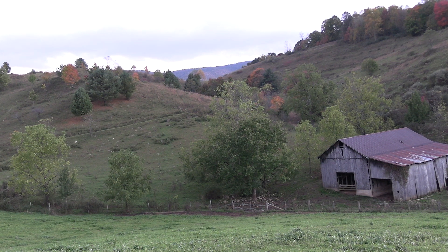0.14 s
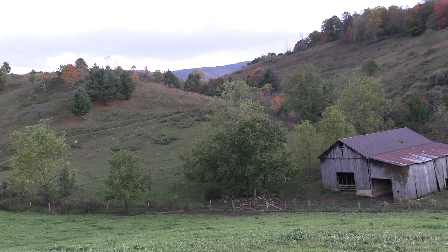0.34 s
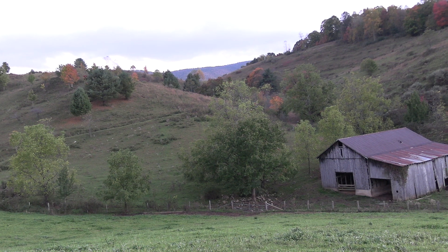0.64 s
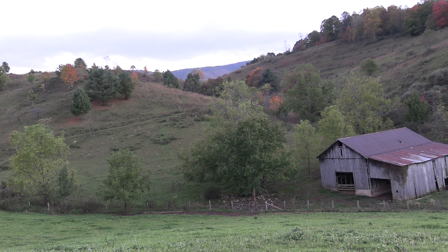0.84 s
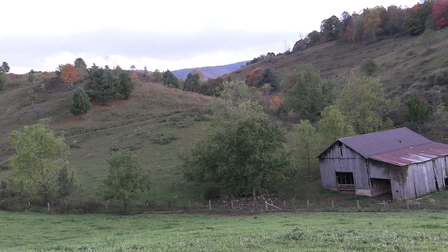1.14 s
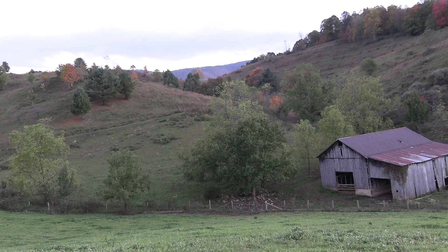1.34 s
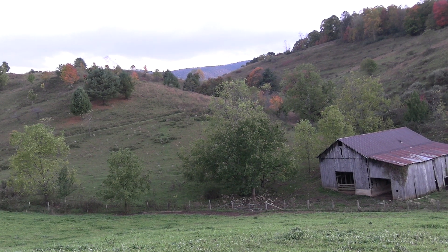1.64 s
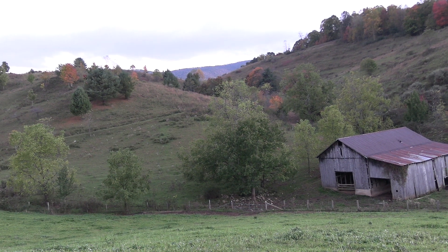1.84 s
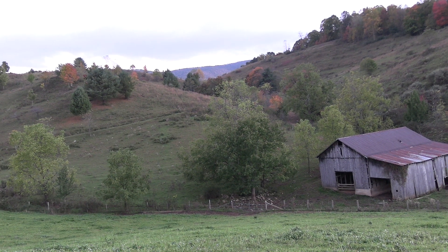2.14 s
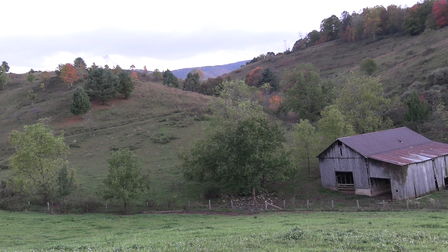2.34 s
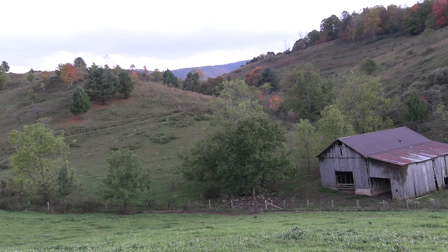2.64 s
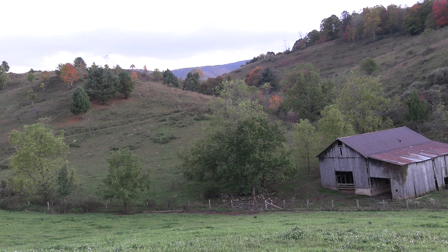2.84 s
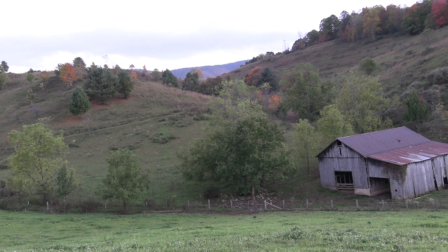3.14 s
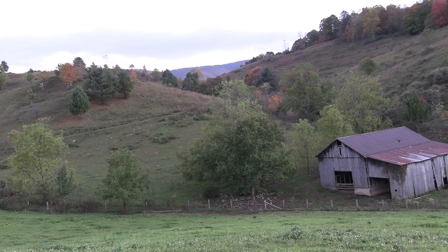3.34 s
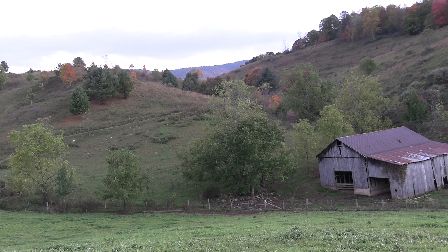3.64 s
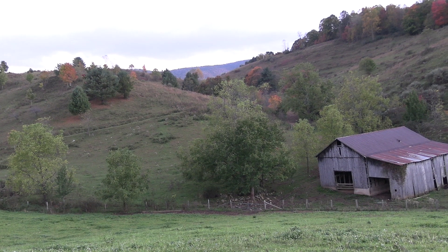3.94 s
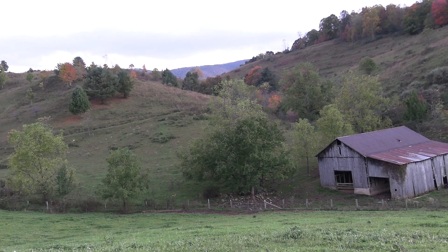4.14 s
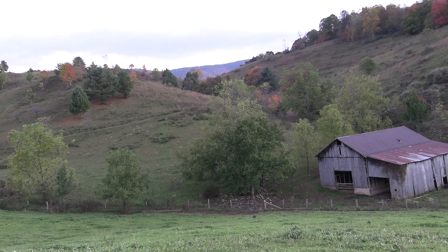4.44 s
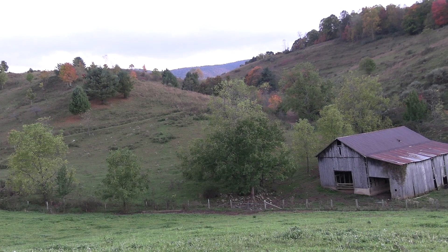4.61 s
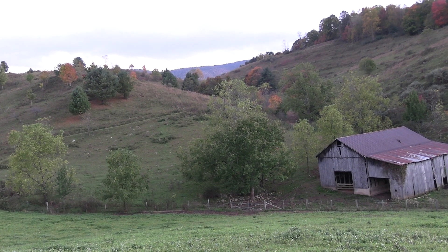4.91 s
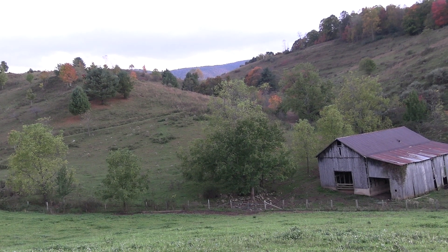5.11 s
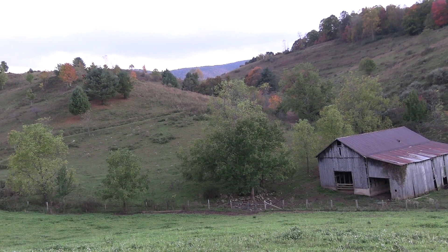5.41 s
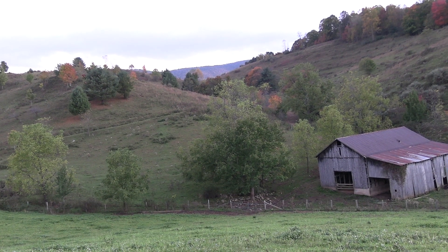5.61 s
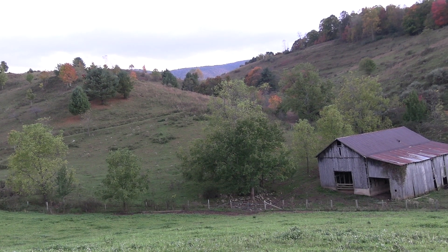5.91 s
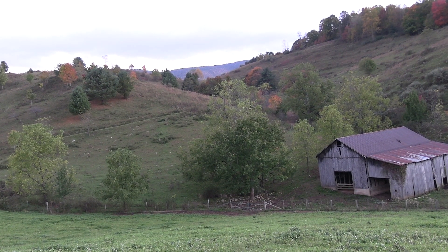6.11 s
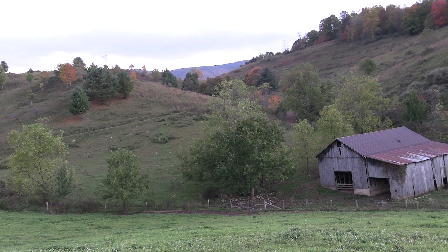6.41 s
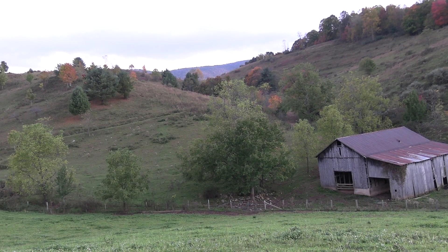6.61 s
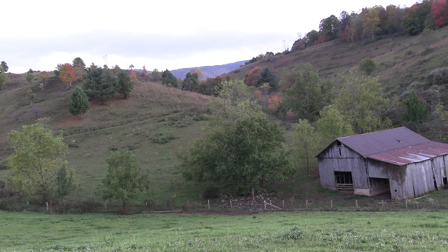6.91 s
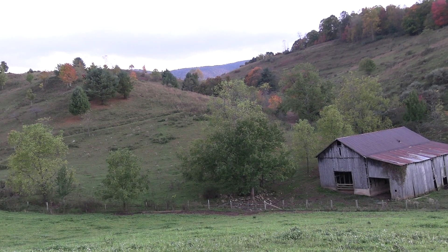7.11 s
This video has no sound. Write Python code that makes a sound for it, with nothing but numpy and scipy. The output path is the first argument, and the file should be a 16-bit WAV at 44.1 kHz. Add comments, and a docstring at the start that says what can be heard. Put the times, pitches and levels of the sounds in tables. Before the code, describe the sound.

A quiet hillside pasture outdoors, with soft still air and a distant insect chorus throbbing in narrow bands. At about 0.2 s a coyote gives a small double-edged bark, quiet and short, while the echo of an earlier howl dies away. From 0.5 s to 4 s nearby crickets trill in separate high, buzzing bursts of a fraction of a second, some clear, some faint; a small bird gives tiny swept chips, and a soft low bump falls near 0.9 s. At 4.1 s a rough bark leads into a wavering yelp, which flips at 4.6 s into a loud high howl, cracking and rasping around 4.9-5.1 s, then settling lower and dropping off at 5.5 s. Hills send back a late, dull wash. At 6.1 s one loud, abrupt hooting bark echoes. Crickets and chips continue to the end at about 7.4 s, with a very faint far howl near 6.5 s.

```python
"""Hill pasture: a coyote barks, breaks from a yelp into a high warbling howl, and barks again; the hills echo it.
Voice: harmonic sines with rasp, undertones and hiss. Barks: chaotic pulses and air through mouth resonances.
Three crickets trill nearby as gated falling tones, and a small bird chips in swept whistles.
Behind them: a far insect chorus in throbbing noise bands, an old echo, still air, low bumps, far tones."""
import sys
import numpy as np
from scipy import signal
from scipy.fft import rfft, irfft
from scipy.io import wavfile
from scipy.ndimage import uniform_filter1d, minimum_filter1d

SR = 44100
rng = np.random.default_rng(int(sys.argv[2]) if len(sys.argv) > 2 else 0)


def store_wav(level_fs):
    """Save 16-bit WAV to argv[1]."""
    pcm = np.round(np.clip(np.atleast_2d(level_fs), -1, 1) * 32767)
    wavfile.write(sys.argv[1], SR, pcm.T.astype(np.int16))


N = 320386
TIME_S = np.arange(N) / SR
FREQS_HZ = np.fft.rfftfreq(N, 1 / SR)

# howl registers, low, high, low again: (time [s], pitch [Hz], level [dB], third-harmonic ring [dB])
YELP = [(4.17, 540, -28, -28), (4.222, 512, -24, -23), (4.252, 465, -43, -5), (4.278, 730, -42, -30),
        (4.327, 890, -25, -32), (4.338, 682, -29, -8), (4.362, 662, -22, -6), (4.395, 645, -23, -7),
        (4.42, 565, -25, -18), (4.455, 525, -21, -13), (4.485, 535, -19.5, -15), (4.51, 645, -22, -8),
        (4.553, 743, -20, -14), (4.603, 789, -19, -21), (4.614, 900, -13, -24)]
SCREAM = [(4.607, 1405, -11.5, -23), (4.66, 1480, -10.5, -16), (4.735, 1555, -11.5, 1),
          (4.81, 1432, -11, -14), (4.85, 1488, -11, -19), (4.9, 1488, -10.5, -16),
          (4.922, 1415, -14.5, -22), (4.945, 1345, -13.5, -16), (4.975, 1465, -15, -28),
          (4.997, 1375, -14.5, -20), (5.102, 1367, -16, -24), (5.118, 1150, -19.5, -24),
          (5.185, 1098, -15.5, -5), (5.42, 1047, -15.5, -5), (5.45, 1038, -17.5, -23),
          (5.51, 1018, -24, -24)]
DROP = [(5.508, 1018, -31, -26), (5.525, 862, -30, -22), (5.542, 612, -28, -16), (5.556, 533, -44, -12)]
# strain of the voice: (time [s], rasp [0-1])
STRAIN = [(4.228, .012), (4.248, .15), (4.265, .005), (4.47, 0), (4.498, .018), (4.507, .19), (4.585, .09),
          (4.61, .2), (4.622, .025), (4.72, .11), (4.8, .075), (4.915, .08), (4.935, .4), (4.962, .42),
          (4.98, .05), (5.0, .22), (5.11, .2), (5.17, .01), (5.42, 0), (5.505, .05), (5.524, .2),
          (5.545, .05)]
# voice catches, pitch dips: (time [s], half-width [s], depth [share of pitch])
CATCHES = [(4.931, 0.0037, 0.15), (4.947, 0.0025, 0.059), (4.961, 0.0046, .12), (5.003, 0.01, .11),
           (5.03, 0.0068, 0.086), (5.053, .004, 0.17), (5.079, .008, 0.12)]
# overtone colour of the throat: (frequency [Hz], gain [dB])
THROAT = [(400, -13), (750, 6), (1300, 9), (2200, -1), (2600, -10.5), (3100, -6), (3750, 0), (4100, -15),
          (4600, -23.5), (5400, -14.5), (6200, -47.5), (9000, -60.5)]
# hiss of the strained folds: (frequency [Hz], relative level [dB])
RASP = [(380, -28.5), (600, -8), (1250, 2), (1800, -11.5), (2700, -20), (3450, -3), (4150, -14),
        (4500, -38), (6000, -43)]
# tremor as the scream settles; depth as share of pitch
QUAVER_START_S, QUAVER_END_S, QUAVER_HZ, QUAVER_DEPTH = 5.11, 5.18, 92, .03
BRIGHTEN_DB_PER_DB = 1.2  # extra treble, against the fundamental, as the voice gets louder

# mouth resonances of a soft, a full and a hooting bark: (frequency [Hz], relative level [dB])
SOFT_MOUTH = [(330, -45), (480, 5.5), (560, -4), (750, -0.5), (980, -12), (1200, -3), (1500, -10),
              (1750, -19.5), (2600, -31), (3000, -56)]
FULL_MOUTH = [(330, -44.5), (440, -7), (560, 7), (720, -4.5), (900, 0), (1200, 0.5), (1500, -4),
              (1800, -9.5), (2100, -11.5), (2600, -24.5), (3000, -58.5)]
HOOT_MOUTH = [(330, -33), (440, -14), (520, -3), (590, 4), (700, -8), (860, -6), (1170, -3.5), (1480, -4.5),
              (1750, -9.5), (2000, -16), (2600, -28), (3000, -50)]
MOUTHS = {"soft": SOFT_MOUTH, "full": FULL_MOUTH, "hoot": HOOT_MOUTH}
# bright edge of a bark: (frequency [Hz], relative level [dB])
BARK_EDGE = [(2600, -24), (3050, -0.5), (3400, 3.5), (3900, -6), (4250, -17.5), (4500, -21), (5400, -27.5),
             (7000, -48)]
# barks: (start [s], peak [s], peak level [dB], fall [dB/s], opening crack [dB], bright edge [dB],
#         pitch [Hz], chaos left from the peak on [0-1], mouth)
BARKS = [(.216, .236, -49, 400, 0, -7, 680, .9, "soft"),
         (.243, .282, -28, 680, 11.5, -22, 700, .35, "soft"),
         (4.108, 4.164, -17, 310, -2, -19, 535, .2, "full"),
         (6.048, 6.118, -11.5, 950, -1.5, -15, 580, .15, "hoot")]
SWELL_DB_PER_S, ONSET_DB_PER_S = 190, 2000  # abrupt start, then swell to the peak
CRACK_HALF_WIDTH_S, EDGE_GROWTH_DB_PER_DB = .004, 2.2  # edge growth per dB of body
# muzzle radiation, no bass and little top: (frequency [Hz], gain [dB])
MUZZLE = [(200, -45), (330, -33.5), (450, -2), (4150, 0.5), (4450, 0), (4700, -13), (5000, -9.5),
          (5450, -1.5), (5800, -10), (8000, -27.5)]

# colour of the hill echo: (frequency [Hz], gain [dB])
HILL_COLOUR = [(300, -6.5), (560, -10.5), (800, -3.5), (1080, -1), (1500, -1), (2200, -3.5), (3200, -3),
               (5000, -18.5)]
# echo crest delay, build-up before it, loss over the next second, early scatter re crest
HILL_DELAY_S, HILL_RISE_DB_PER_S, HILL_LOSS_DB, HILL_EARLY_DB = .4, 85, 10.2, -22
HILL_LAST_S = 2.15  # farthest slope
OLD_ECHO_DB, OLD_ECHO_FALL_DB_PER_S = -58.3, 22  # an earlier howl dying away

# wing strokes: name: (rate [1/s], pitch [Hz], first scrape [dB], its width [s],
#                      second scrape at [s], its width [s], octave [dB])
CRICKETS = {"loud": (46.05, 7540, -1.5, .0012, .0062, .0019, -28),
            "swept": (45.4, 7350, 2, .0007, .0072, .0018, -9.5),
            "faint": (44.6, 6900, -2, .0013, .004, .0035, -27)}
# trills: (start [s], length [s], level [dB], cricket)
TRILLS = [(.474, .146, -45, "loud"), (.754, .26, -53.5, "swept"), (.996, .193, -45, "loud"),
          (1.193, .122, -57, "faint"), (1.586, .169, -45, "loud"), (1.69, .14, -62, "faint"),
          (2.135, .115, -57, "faint"), (2.185, .186, -45, "loud"), (2.59, .258, -49.5, "swept"),
          (2.788, .172, -45, "loud"), (3.04, .15, -58, "faint"), (3.304, .28, -45, "loud"),
          (3.52, .14, -60, "faint"), (3.585, .083, -52, "loud"), (3.945, .145, -58, "faint"),
          (4.375, .125, -56, "faint"), (4.484, .215, -53.5, "swept"), (4.694, .149, -47.5, "loud"),
          (5.119, .305, -55.5, "swept"), (5.448, .167, -47, "loud"), (5.864, .305, -52.5, "swept"),
          (6.163, .17, -47, "loud"), (6.475, .12, -56, "faint"), (6.781, .193, -45.5, "loud"),
          (6.931, .305, -50.5, "swept")]
STROKE_SAG_HZ_PER_S, FIRST_SCRAPE_S = 33000, .0014  # the wing slows through each stroke
WING_RING_DB, WING_RING_S = -12, .012  # the wing rings on between scrapes

# bird chips: (time of lowest pitch [s], level [dB], fade-in [s], fade-out [s])
CHIPS = [(.328, -57, .001, .008), (.683, -56, .001, .008), (.732, -52, .004, .004),
         (2.258, -51, .004, .004), (2.588, -51, .001, .008), (4.447, -46.5, .004, .004),
         (4.688, -45, .001, .009), (5.70, -48.5, .004, .004), (6.609, -51, .001, .008),
         (6.73, -49, .004, .004)]
CHIP_LOW_HZ, CHIP_SWEEP_HZ, CHIP_GLIDE_S = 5080, 2900, .0052

# main far chorus: (time [s], level [dB])
FIELD_CRICKETS = [(0, -57.5), (.4, -60), (1.45, -60), (2.03, -53.5), (2.67, -61), (3.33, -58),
                  (4.05, -59.5)]
# other far choruses: (centre [Hz], width [Hz], level [dB], mean pulse rate [1/s], pulse depth [0-1])
CHORUSES = [(1675, 170, -70, 19, .6), (3800, 490, -71, 4.7, 0.3), (5260, 460, -72.5, 15.3, .35),
            (5580, 350, -80, 39, .3)]
# still outdoor air: (frequency [Hz], relative level [dB])
AIR = [(20, 1), (50, -6), (110, -6), (200, -14.5), (350, -18), (650, -23), (1400, -24), (2500, -31.5),
       (4000, -25.5), (4600, -34), (6000, -32), (8500, -35.5), (11000, -37), (15500, -40.5)]
# soft low bumps: (time [s], level [dB])
THUMPS = [(0.887, -39), (1.315, -50), (4.262, -43.5)]
# two far howls and a low drone: (start [s], end [s], pitch [Hz], level [dB], waver [Hz])
FAR_TONES = [(3.15, 3.95, 915, -71, 12), (6.4, 7.0, 585, -65, 8), (6.38, 7.12, 143, -55, 3)]
CUTOFF_HZ = 15750


def howl():
    """The yelp flips up an octave into the scream, which catches, quavers as it settles, then drops away."""
    dips = sum(depth * bump(TIME_S, s, width_s) for s, width_s, depth in CATCHES)
    quaver = QUAVER_DEPTH * gate(QUAVER_START_S, QUAVER_END_S, .02) * np.sin(2 * np.pi * QUAVER_HZ * TIME_S)
    yelp = voice(YELP, 0, clean_db=-23, second_db=15.5, high_db=-27, high_rasp_db=10, under_db=4,
                 top_hz=5500, jitter=.12, hiss_db=-4)
    scream = voice(SCREAM, dips + quaver, clean_db=-32, second_db=0.8, high_db=-26.5, high_rasp_db=-30,
                   under_db=-3.5, top_hz=6000, jitter=.04, hiss_db=-16, shimmer=.75)
    drop = voice(DROP, 0, clean_db=-23, second_db=14, high_db=-30, high_rasp_db=-8, under_db=-6,
                 top_hz=5500, jitter=.06, hiss_db=-12)
    return yelp + drop + scream * (1 + 9 * quaver)


def voice(rows, dips, clean_db, second_db, high_db, high_rasp_db, under_db, top_hz, jitter, hiss_db,
          shimmer=1.0, snap_db=6, flare_db=10, surge_db=3.5):
    """One register: clean folds favour odd harmonics; strain adds octave, treble, half-pitch undertones, rasp."""
    pitch_hz, level_db, third_db = in_time(rows)
    rasp = np.clip(in_time(STRAIN)[0], 0, 1)
    pitch_hz = pitch_hz * (1 - dips) * (1 + jitter * (rasp + 0.066) * band_noise(0, 440))
    flutter = 1 + np.tanh(shimmer * rasp * band_noise(0, 250))
    # at each catch the folds slap harder: the voice surges, the overtones flare
    slap = np.tanh(dips / .08) * np.ones(N)
    surge = from_db(surge_db * slap)
    hiss = from_db(hiss_db) * (rasp + 5 * dips) * colour(rng.standard_normal(N), RASP)

    sounding = gate(rows[0][0], rows[-1][0], .007)
    on = sounding > 0
    pitch_hz, rasp, slap = pitch_hz[on], rasp[on], slap[on]
    phase = phase_of(pitch_hz)
    second_gain = from_db(clean_db) + from_db(second_db) * rasp
    second = second_gain * gain_at(THROAT, 2 * pitch_hz) * np.sin(2 * phase)
    third_gain = from_db(third_db[on] + flare_db * slap)
    third = third_gain * gain_at(THROAT, 3 * pitch_hz) * np.sin(3 * phase)

    k = np.arange(4, 11)[:, None]
    # rough folds lose their highest overtones
    weights = gain_at(THROAT, k * pitch_hz) / (1 + (k * pitch_hz * (1 + rasp) / top_hz) ** 20)
    brightness = from_db(BRIGHTEN_DB_PER_DB * (level_db[on] + 18))
    high_gain = brightness * (from_db(high_db) + from_db(high_rasp_db) * rasp)
    high = high_gain * (weights * np.sin(k * phase)).sum(0)

    # the throat delays each undertone differently, so they do not pile up into spikes
    halves = np.arange(.5, 3)[:, None]
    offsets = rng.uniform(0, 2 * np.pi, halves.shape)
    undertones = gain_at(THROAT, halves * pitch_hz) * np.sin(halves * phase + offsets)
    under = rasp * from_db(under_db + snap_db * rasp * (slap - 1)) * undertones.sum(0)

    tones = np.sin(phase) + second + third + high + under
    out = np.zeros(N)
    # hiss puffs once a cycle
    out[on] = np.sqrt(2) * tones * flutter[on] + hiss[on] * (1 + np.cos(phase))
    return out * from_db(level_db) * surge * sounding


def bark(start_s, peak_s, peak_db, fall_db_per_s, crack_db, edge_db, pitch_hz, settled, mouth):
    """Chaotic fold pulses and puffs of air ring in the mouth; the pitch steadies as the bark swells."""
    swell_db = SWELL_DB_PER_S * (TIME_S - peak_s)
    fall_db = fall_db_per_s * (peak_s - TIME_S)
    effort_db = np.minimum(swell_db, fall_db) - ONSET_DB_PER_S * np.maximum(start_s - TIME_S, 0)
    effort_db = np.maximum(effort_db + crack_db * bump(TIME_S, start_s, CRACK_HALF_WIDTH_S), -150)
    chaos = np.interp(TIME_S, [start_s, peak_s], [1, settled])
    phase = phase_of(pitch_hz * (1 + .33 * chaos * band_noise(0, 450)))
    pulses = rms_one(np.exp(6 * (np.cos(phase) - 1)) * from_db(2.5 * band_noise(0, 400)))
    air = (pulses + 1) * rng.standard_normal(N)
    source = np.diff(pulses, prepend=0) * 6 + .35 * pulses + 1.6 * air
    out = 0
    layers = ((MOUTHS[mouth], effort_db), (BARK_EDGE, edge_db + EDGE_GROWTH_DB_PER_DB * effort_db))
    for spectrum, layer_db in layers:
        ringing = colour(source, spectrum)
        # level out the ringing so that the effort alone sets the envelope
        local_rms = np.sqrt(uniform_filter1d(ringing ** 2, size=500) + 1e-9)
        out = out + from_db(peak_db + layer_db) * ringing / local_rms
    surges = 1 + .35 * np.tanh(band_noise(0, 170))  # coarse, uneven
    return out * surges * gate(start_s - .03, peak_s + .095, .006)


def hills(x):
    """Wooded slopes scatter the calls back late, in a long dull wash that dies fast at first, then slowly."""
    late_s = TIME_S - HILL_DELAY_S
    rise_db = np.maximum(HILL_RISE_DB_PER_S * late_s, HILL_EARLY_DB)
    fall_db = -HILL_LOSS_DB * np.sqrt(np.maximum(late_s, 0))
    response = rng.standard_normal(N) * from_db(np.minimum(rise_db, fall_db)) * gate(-1, HILL_LAST_S, .9)
    response /= np.sqrt(np.sum(response ** 2))
    coloured = irfft(rfft(response) * gain_at(HILL_COLOUR, FREQS_HZ), N)
    return signal.fftconvolve(x, coloured[:N // 2])[:N]


def nearby(x, t60_s=.22):
    """Ground and bushes close by add a brief scatter: decaying noise after 8 ms."""
    response = (rng.standard_normal(N) * from_db(-60 * TIME_S / t60_s) * (TIME_S > .008))[:SR // 2]
    return signal.fftconvolve(x, response / np.sqrt(np.sum(response ** 2)))[:N]


def old_howl_echo():
    """An earlier howl dies away as a decaying noise band."""
    return from_db(OLD_ECHO_DB - OLD_ECHO_FALL_DB_PER_S * TIME_S) * band_noise(1280, 330)


def crickets():
    """Three neighbours trill at nearly the same stroke rate."""
    return cricket("loud", scratch=.029) + cricket("swept", scratch=.02) + cricket("faint", scratch=.01)


def cricket(name, scratch):
    """Each stroke drags a file over the scraper: a short falling tone that snags part-way, so two scrapes."""
    per_s, hz, first_db, first_width_s, second_at_s, second_width_s, octave_db = CRICKETS[name]
    since_s, level = np.zeros(N), np.zeros(N)
    for start_s, length_s, db, singer in TRILLS:
        if singer == name:
            on = (TIME_S >= start_s) & (TIME_S < start_s + length_s)
            age_s = TIME_S[on] - start_s
            since_s[on] = age_s % (1 / per_s)
            level[on] = from_db(db) * (1 - 0.56 * np.exp(-age_s / .025))
    first = from_db(first_db) * bump(since_s, FIRST_SCRAPE_S, first_width_s)
    scrapes = first + bump(since_s, second_at_s, second_width_s)
    # the file bites evenly, so each scrape has a flat top
    tone = np.maximum(np.tanh(1.8 * scrapes), from_db(WING_RING_DB) * np.exp(-since_s / WING_RING_S))
    octave = from_db(octave_db) * bump(since_s, .005, .004)
    phase = phase_of((hz - STROKE_SAG_HZ_PER_S * since_s) * (1 + scratch * band_noise(0, 1700)))
    uneven = from_db(1.6 * band_noise(0, 120))
    return level * uneven * (tone * np.sin(phase) + octave * np.sin(2 * phase))


def chips():
    """One fast whistle dives to its lowest pitch and sweeps up; some sound almost only on the way up."""
    out = np.zeros(N)
    for s, db, fade_in_s, fade_out_s in CHIPS:
        on = (TIME_S > s - 2.5 * fade_in_s) & (TIME_S < s + 3 * fade_out_s)
        age_s = TIME_S[on] - s
        hz = CHIP_LOW_HZ + CHIP_SWEEP_HZ * age_s ** 2 / (age_s ** 2 + CHIP_GLIDE_S ** 2)
        envelope = np.exp(np.minimum(age_s / fade_in_s, -age_s / fade_out_s))
        out[on] += from_db(db) * envelope * np.sin(phase_of(hz))
    return np.sqrt(2) * out


def chorus():
    """Many far insects merge into narrow throbbing bands."""
    main_level = from_db(in_time(FIELD_CRICKETS)[0] + .8 * band_noise(0, 9))
    out = main_level * band_noise(3185, 300) * (1 + 0.17 * band_noise(29.5, 4))
    for hz, width_hz, db, per_s, depth in CHORUSES:
        throb = 1 + depth * np.sin(phase_of(per_s * (1 + .15 * band_noise(0, 6))))
        out = out + from_db(db) * band_noise(hz, width_hz) * throb
    return out


def background():
    """Coloured noise for air, noise bursts for low bumps, wavering sines for far tones."""
    air = from_db(-52.5) * colour(rng.standard_normal(N), AIR)
    bumps = sum(from_db(db) * gate(s, s + 1, .012) * np.exp(-np.abs(TIME_S - s) / 0.02) for s, db in THUMPS)
    far = np.zeros(N)
    for start_s, end_s, hz, db, waver_hz in FAR_TONES:
        level = from_db(db + 2.5 * band_noise(0, 10)) * gate(start_s, end_s, .2)
        far += level * np.sin(phase_of(hz + waver_hz * band_noise(0, 17)))
    return air + bumps * band_noise(110, 210) + far


def from_db(db):
    """Decibels to gain."""
    return 10 ** (np.asarray(db) / 20)


def rms_one(x):
    """Scale to rms 1."""
    return x / np.sqrt(np.mean(x ** 2) + 1e-20)


def in_time(rows):
    """Each column of a curve at every sample."""
    s, *columns = np.transpose(rows)
    return [np.interp(TIME_S, s, c) for c in columns]


def gain_at(spectrum, hz):
    """Gain of a (frequency [Hz], level [dB]) spectrum, interpolated over log frequency."""
    points_hz, db = np.transpose(spectrum)
    return from_db(np.interp(np.log(hz + 1), np.log(points_hz), db))


def colour(x, spectrum):
    """Filter by a spectrum; rms 1."""
    return rms_one(irfft(rfft(x) * gain_at(spectrum, FREQS_HZ), N))


def band_noise(hz, width_hz):
    """Noise in one resonance; at 0 Hz, a random wander. Rms 1."""
    response = 1 / (1 + ((FREQS_HZ - hz) / width_hz) ** 2) ** 2
    return rms_one(irfft(rfft(rng.standard_normal(N)) * response, N))


def phase_of(hz):
    """Running phase [rad] of a moving pitch."""
    return 2 * np.pi * np.cumsum(hz) / SR


def gate(start_s, end_s, fade_s):
    """1 between two times, with linear ramps."""
    return np.clip(np.minimum(TIME_S - start_s, end_s - TIME_S) / fade_s + .5, 0, 1)


def bump(t, centre, width):
    """Bell curve of height 1; half-width to 1/e."""
    return np.exp(-((t - centre) / width) ** 2)


def scene():
    """Coyote and echoes over crickets, bird, chorus and air."""
    calls = sum(bark(*row) for row in BARKS) + howl()
    coyote = irfft(rfft(calls) * gain_at(MUZZLE, FREQS_HZ), N)
    echo = from_db(-22.5) * hills(coyote) + from_db(-24) * nearby(coyote)
    insects_and_bird = crickets() + chorus() + chips()
    return (coyote + echo + old_howl_echo() + insects_and_bird + background())[None]


def record(dry):
    """A fast limiter holds the peaks; a steep low-pass cuts the top."""
    room_left = np.minimum(1, .53 / (np.abs(dry) + 1e-9))
    gain = uniform_filter1d(minimum_filter1d(room_left, size=300), size=300)
    low_pass = signal.ellip(10, .1, 80, CUTOFF_HZ, fs=SR, output="sos")
    return signal.sosfilt(low_pass, dry * gain)


dry = scene()
out = record(dry)
store_wav(out)
```